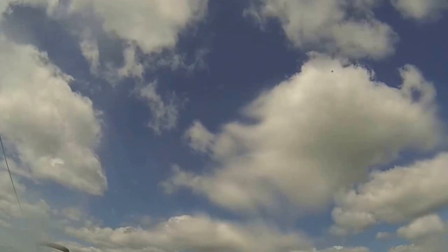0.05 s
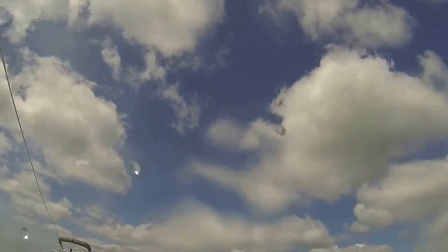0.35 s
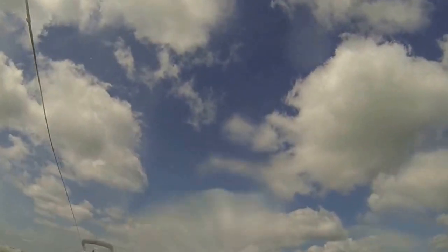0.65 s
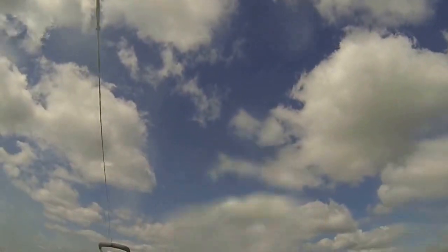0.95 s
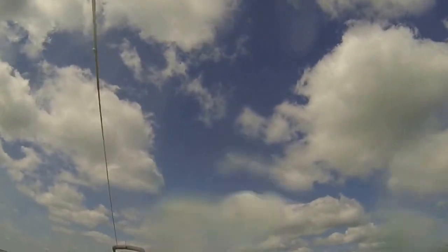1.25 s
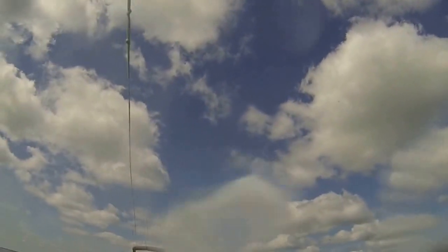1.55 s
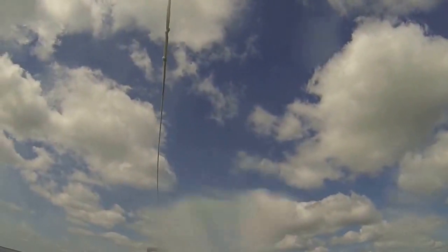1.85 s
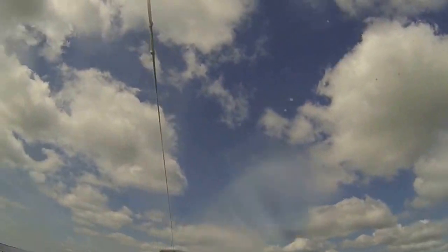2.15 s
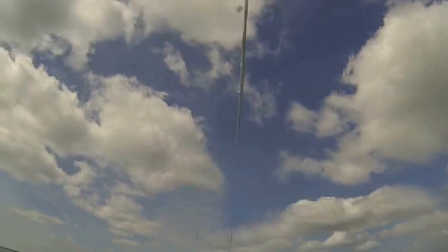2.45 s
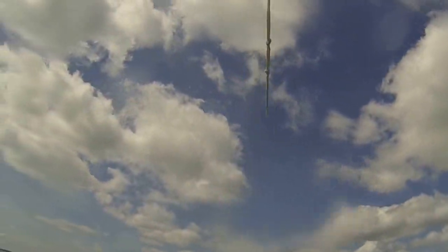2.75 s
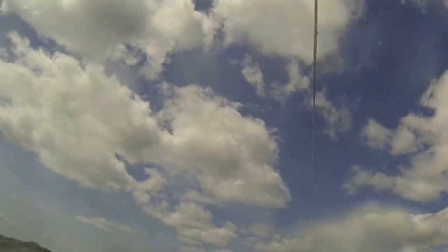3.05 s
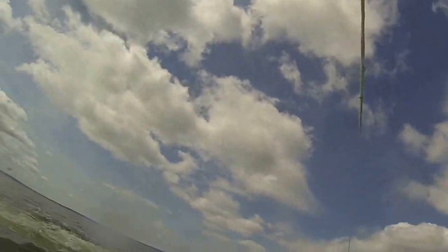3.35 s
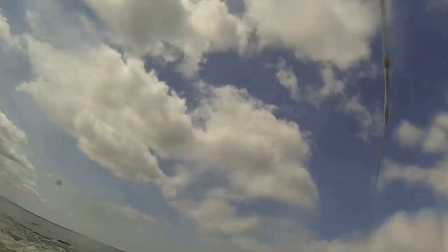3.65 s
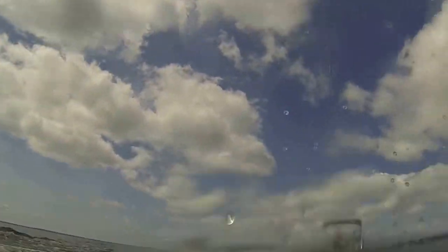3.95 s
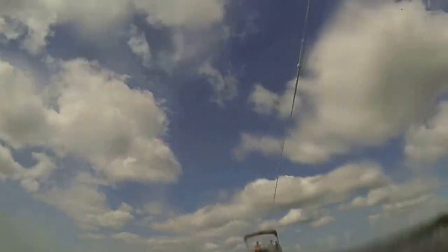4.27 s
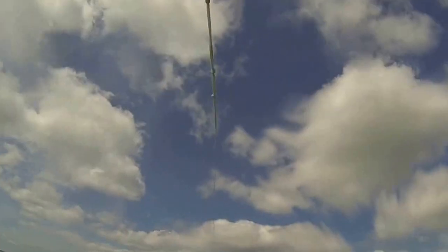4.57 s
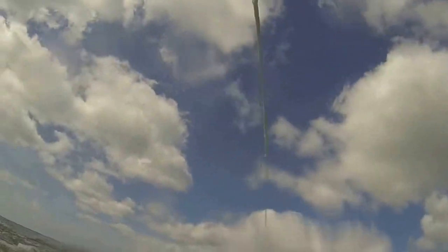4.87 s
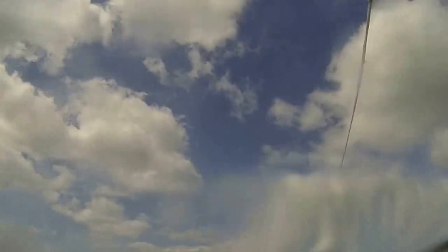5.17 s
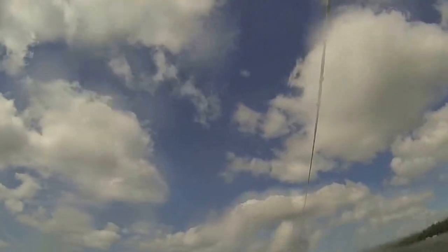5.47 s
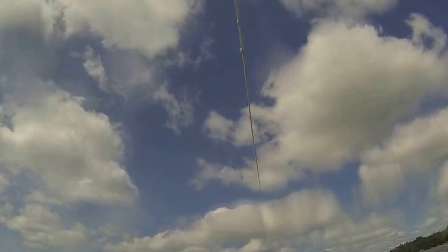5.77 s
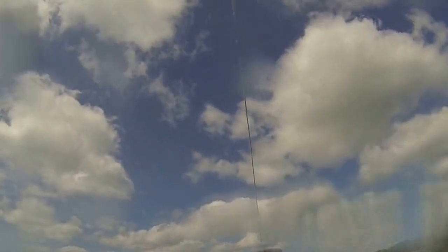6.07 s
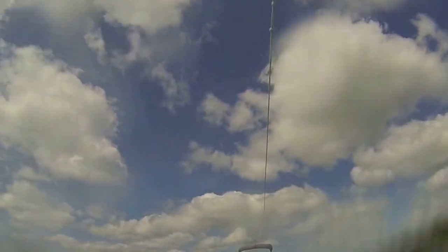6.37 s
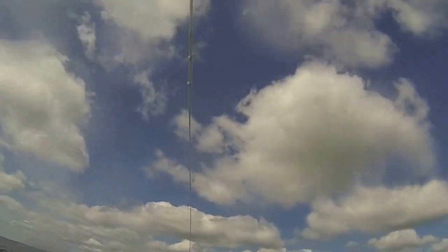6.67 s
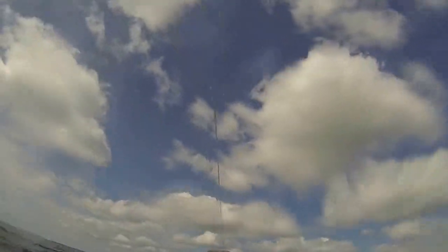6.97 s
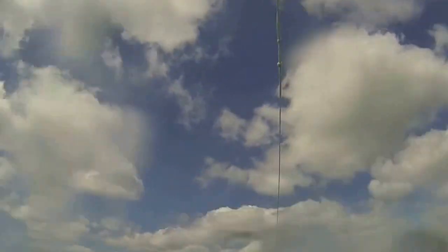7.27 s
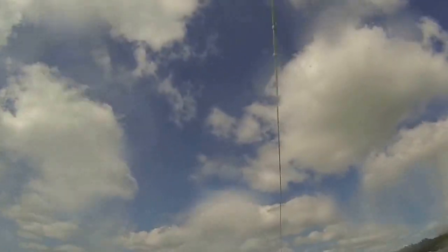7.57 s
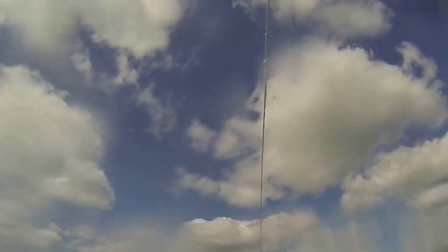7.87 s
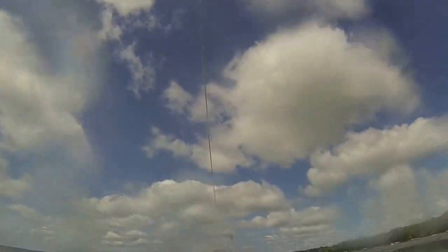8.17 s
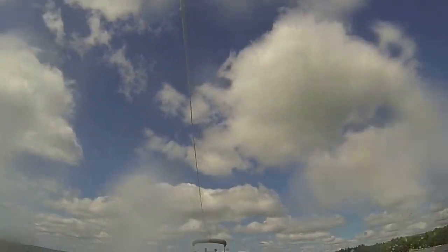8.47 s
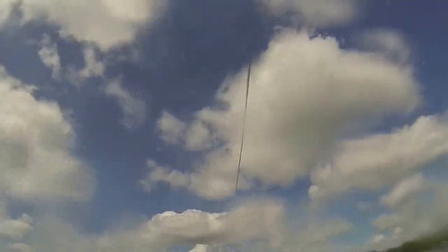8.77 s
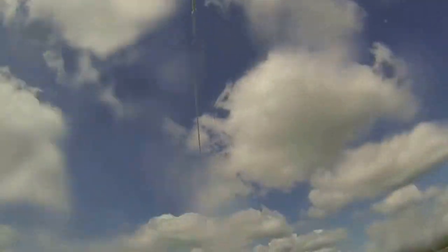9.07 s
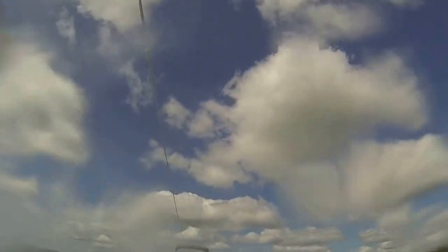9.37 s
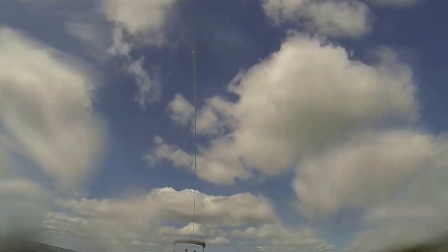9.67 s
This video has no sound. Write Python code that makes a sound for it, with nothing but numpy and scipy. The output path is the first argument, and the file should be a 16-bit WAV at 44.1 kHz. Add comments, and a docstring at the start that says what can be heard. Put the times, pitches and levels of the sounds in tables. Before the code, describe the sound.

A microphone in a waterproof case rides a tube towed fast over choppy open water. Wind shakes the case with a deep, continuous flutter. Just below, the wake surges and fizzes several times a second, sounding boxy, and hushes briefly with each skip. Water slaps the case, hard jolts make it click and thud, and drops plop on it. The loudest blows briefly overload the microphone.

```python
"""Open, choppy water, on a tube towed fast behind a motorboat; one microphone in a waterproof case.
Wind shakes the case with a deep flutter. Just below, the wake surges with each wave and hushes with
each skip, boxy through the case. Right at the microphone water slaps the case, hard jolts make it
click and drops plop on it; the loudest blows overload the microphone and the gain ducks briefly."""
import sys
import numpy as np
from scipy import signal
from scipy.fft import rfft, irfft, next_fast_len
from scipy.io import wavfile
from scipy.ndimage import uniform_filter1d, minimum_filter1d, map_coordinates

SR = 44100
rng = np.random.default_rng(int(sys.argv[2]) if len(sys.argv) > 2 else 0)


def master(y):
    """Save y as 16-bit WAV."""
    cut = np.clip(np.atleast_2d(y).T, -1, 1)
    pcm = np.round(cut * 32767)  # scale
    wavfile.write(sys.argv[1], SR, pcm.astype(np.int16))


N = 428652

# The tube ploughs into a wave. Each row: start and length in seconds, spray and churning in relative dB.
WAVES = [(0.0, 0.04, -27.5, -18.5), (0.252, 0.04, -30.5, -20.5), (0.537, 0.034, -37.5, -20.5),
         (0.663, 0.044, -31, -21.5), (0.844, 0.045, -33.5, -22), (0.952, 0.084, -35, -27.5),
         (1.302, 0.056, -30.5, -21.5), (1.477, 0.03, -36, -23), (1.59, 0.14, -36.5, -33),
         (1.821, 0.18, -39.5, -29), (2.254, 0.015, -27.5, -16.5), (2.63, 0.011, -35, -25),
         (2.944, 0.061, -34, -20), (3.048, 0.087, -40.5, -33), (3.452, 0.045, -33.5, -39),
         (3.542, 0.015, -26, -16), (3.83, 0.017, -37, -41), (3.965, 0.081, -38.5, -30),
         (4.353, 0.036, -33, -26.5), (4.456, 0.085, -37, -24.5), (4.73, 0.05, -29, -31),
         (4.839, 0.02, -23, -15.5), (5.182, 0.09, -42, -31), (5.378, 0.16, -41, -29.5),
         (5.606, 0.1, -49, -28.5), (5.797, 0.029, -35, -25), (6.083, 0.02, -36, -20.5),
         (6.224, 0.12, -48, -29), (6.456, 0.046, -28.5, -21), (6.76, 0.006, -32, -55),
         (6.812, 0.023, -29.5, -26.5), (7.053, 0.17, -43.5, -33.5), (7.299, 0.012, -26, -20.5),
         (7.333, 0.078, -33.5, -26.5), (7.624, 0.037, -27, -22), (7.846, 0.041, -28, -21),
         (8.141, 0.058, -32.5, -23.5), (8.345, 0.058, -35.5, -24.5), (8.535, 0.05, -35.5, -29.5),
         (8.597, 0.055, -30.5, -18.5), (8.818, 0.23, -35, -27.5), (9.099, 0.08, -37.5, -26),
         (9.283, .11, -46, -33.5), (9.5, 0.035, -41, -24.5), (9.679, 0.072, -40.5, -28.5)]
# Spray as heard inside the case. Each row: frequency in Hz, relative density in dB.
SPRAY = [(500, -12.5), (1000, -15), (1220, 1), (1430, 8.5), (1720, 3.5), (2150, -11), (2700, -14),
         (3350, -8.5), (3900, -23.5), (4400, -17.5), (5500, -27.5), (7800, -27.5), (11500, -69),
         (14500, -101)]
SKIP_DB = -8.5  # dip of spray and ticks while the tube is clear of the water


def amp(db):
    """Decibels to gain."""
    return 10 ** (np.asarray(db) / 20)


def unit(x):
    """Scale to rms 1."""
    return x / np.sqrt(np.mean(x ** 2) + 1e-20)


def curve(rows):
    """Join (seconds, value) points into one value per sample."""
    return np.interp(np.arange(N) / SR, *np.transpose(rows))


def wobble(rate):
    """A smooth random curve, rate knots a second."""
    coarse = np.arange(0, N, 12)
    knots = rng.standard_normal(int(N * rate / SR) + 4)
    return np.interp(np.arange(N), coarse, map_coordinates(knots, [coarse * rate / SR]))


def hiss(rate, ragged_db):
    """White noise whose level flickers at the given rate."""
    return rng.standard_normal(N) * amp(ragged_db * wobble(rate))


def filtered(x, response):
    """Filter x by a gain given as a function of Hz."""
    size = next_fast_len(N + SR // 2)
    return irfft(rfft(x, size) * response(np.fft.rfftfreq(size, 1 / SR)), size)[:N]


def coloured(x, spectrum):
    """x shaped by (Hz, dB) points on a log axis, at rms 1."""
    points_hz, db = np.transpose(spectrum)
    return unit(filtered(x, lambda hz: amp(np.interp(np.log(hz + 1), np.log(points_hz), db))))


def dulled(x, corner_hz):
    """Low-pass, 12 dB an octave."""
    return filtered(x, lambda hz: 1 / np.sqrt(1 + (hz / corner_hz) ** 4))


def wandering(x, depth, rate):
    """The pitch of everything in x drifts up and down by a share depth."""
    return map_coordinates(x, [np.arange(N) + np.cumsum(depth * wobble(rate))], mode="mirror")


def add(track, start, sound):
    """Mix a sound into the track from start seconds."""
    at = round(start * SR) + np.arange(len(sound))
    inside = (at >= 0) & (at < N)
    track[at[inside]] += sound[inside]


def scatter(rate):
    """Random moments, rate a second. Each row: sample, size and shape, both from -1 to 1."""
    rows = rng.random((3000, 3))[:int(rate * N / SR)]
    return [(int(at * N), 2 * size - 1, 2 * shape - 1) for at, size, shape in rows]


def skipping(fade_s=0.0059):
    """How far the tube is out of the water, 0-1."""
    # The tube skips clear. Each row: start and length in seconds.
    skips = [(0.159, 0.08), (0.422, 0.08), (0.798, 0.037), (1.072, 0.08), (2.069, 0.034), (2.208, 0.028),
             (2.54, 0.026), (2.781, 0.056), (3.316, 0.024), (4.319, 0.015), (5.002, 0.032), (5.752, 0.051),
             (6.682, 0.085), (7.738, 0.064), (8.48, 0.029), (9.586, 0.054)]
    t, clear = np.arange(N) / SR, np.zeros(N)
    for start, length in skips:
        end = start + length
        clear += np.interp(t, [start - fade_s, start, end, end + fade_s], [0, 1, 1, 0])
    return clear


def wind(db=-1.74, evenness=0.57, gust_db=2.5, skip_db=-4):
    """Eddies shed by the case give a deep flutter that wavers with the gusts."""
    # Airflow round the case. Each row: time in seconds, relative level in dB.
    airflow = [(0, -17), (1.3, -16.5), (2.13, -15), (2.22, -31), (2.33, -12.5), (2.57, -26.5),
               (2.67, -16.5), (2.87, -23), (2.97, -13), (3.2, -21.5), (3.5, -17.5), (6.32, -16),
               (6.42, -27), (6.54, -15.5), (8.64, -16), (8.93, -23), (9.0, -14.5), (9.72, -20)]
    # The flutter inside the case. Each row: frequency in Hz, relative density in dB.
    flutter = [(12, -22.5), (24, -8), (31, -9), (35, 4), (44, -11), (65, -15.5), (110, -23.5), (600, -120)]
    eddies = coloured(rng.standard_normal(N), flutter)
    swell = uniform_filter1d(np.abs(signal.hilbert(eddies)), size=3000)
    evened = unit(eddies / swell ** evenness)  # shedding partly evens out its own swells
    gusts_db = gust_db * wobble(rate=9) + skip_db * skipping()
    return amp(curve(airflow) + gusts_db + db) * evened


def swells(peaks_db, calm_db, linger_db, lag_s=0):
    """The wake's level in dB: each wave rises from the calm, holds, drops and leaves lingering foam."""
    attack_s, release_s, linger_s = 0.023, 0.027, 0.17  # each for a change of 20 dB
    t = np.arange(0, N, 32) / SR
    power = amp(calm_db) ** 2
    for (start, length, *_), peak_db in zip(WAVES, peaks_db):
        before = np.maximum(start + lag_s - t, 0)
        after = np.maximum(t - start - lag_s - length, 0)
        fall_db = np.maximum(-20 * after / release_s, linger_db - 20 * after / linger_s)
        power = power + amp(peak_db - 20 * before / attack_s + fall_db) ** 2
    return np.interp(np.arange(N) / SR, t, 10 * np.log10(power))


def chop(spatter_follows=0.56, usual_db=-30, churn_skip_db=-7):
    """Spray, churning and spatter in dB: a wave sprays first, then churns and flings more water."""
    # Small drops and lumps flying at the case. Each row: time in seconds, relative level in dB.
    spatter = [(0, -31.5), (.9, -47.5), (1.4, -43.5), (2.1, -40), (2.45, -19.5), (2.85, -55.5),
               (3.75, -38.5), (4.1, -23), (4.5, -55), (5.0, -35), (5.28, -13), (5.48, -53), (5.85, -32.5),
               (6.3, -36.5), (7.1, -42.5), (8.15, -35.5), (8.55, -57.5), (9.4, -30), (9.72, -44)]
    _, _, sprays_db, churns_db = np.transpose(WAVES)
    clear = skipping()
    surge_db = swells(sprays_db, calm_db=-44.5, linger_db=-7.5) + SKIP_DB * clear
    churning_db = swells(churns_db, calm_db=-37, linger_db=-7.0, lag_s=0.011) + churn_skip_db * clear
    spatter_db = curve(spatter) + spatter_follows * (churning_db - usual_db)
    return surge_db, churning_db, spatter_db


def fizz(count=4000, centre_hz=2200, pitch_spread=0.378, cycles=5, spread_db=3):
    """A cloud of tiny ringing bubbles in the foam, at rms 1."""
    at, pitch, size = rng.random(count), rng.standard_normal(count), rng.exponential(size=count)
    n = np.arange(SR // 70)
    turns = centre_hz * np.exp(pitch_spread * pitch)[:, None] * n / SR
    gains = amp(spread_db * np.minimum(size, 3))[:, None]
    rings = gains * turns * np.exp(-2 * turns / cycles) * np.sin(2 * np.pi * turns)
    samples = (at * N).astype(int)[:, None] + n
    return unit(np.bincount(samples.ravel(), rings.ravel(), N)[:N])


def wake(surge_db, churning_db, spray_db=1.05, sheet_db=-35.5, churn_db=1.1, uneven_db=1):
    """Foam fizzes and hisses in uneven surges of shifting pitch while water churns under the tube."""
    # A torn sheet of water, and the churning. Each row: frequency in Hz, relative density in dB.
    sheet_spectrum = [(600, -55.5), (1700, 15), (3400, 4.5), (4000, -17), (7000, -29), (16000, -98)]
    churn_spectrum = [(35, -16), (70, -7.5), (110, 0), (190, -2), (285, 1), (380, -8), (520, -13),
                      (650, -22), (800, -20), (1100, -68.5), (6000, -120)]
    foam = hiss(rate=200, ragged_db=3.8) + .35 * fizz()
    spray_gain = amp(surge_db + spray_db + uneven_db * wobble(rate=31))
    spray = spray_gain * wandering(coloured(foam, SPRAY), depth=.025, rate=12)
    # a strong surge tears off a brighter, grittier sheet of water
    sheet_gain = amp(1.02 * (surge_db + 28.0) + sheet_db)
    sheet = sheet_gain * coloured(hiss(rate=130, ragged_db=10.5), sheet_spectrum)
    churn = amp(churning_db + churn_db) * coloured(hiss(rate=80, ragged_db=5), churn_spectrum)
    return spray + sheet + churn


def plop(hz, cycles, rise=0.0081):
    """A strongly damped bubble: soft start, pitch rising as it nears the surface."""
    turns = hz * np.arange(SR // 60) / SR
    age = turns / cycles  # loudest at 1
    envelope = age ** 2 * np.exp(2 * (1 - age))
    return envelope * np.sin(2 * np.pi * turns * (1 + rise * np.tanh(age / 2)))


def burble(surge_db, db=-1, spread_db=5, centre_hz=2400, tilt_db=2):
    """Larger bubbles chirp in each surge, the low ones loudest."""
    out = np.zeros(N)
    for i, size, pitch in scatter(rate=70):
        gain = amp(surge_db[i] + db + spread_db * size - tilt_db * pitch)
        add(out, i / SR, gain * plop(centre_hz * np.exp(.35 * pitch), cycles=1.97))
    return out


def mist(surge_db, db=-32, follows=0.57):
    """Fine droplets crackle on the case all the time, swelling less than the spray."""
    # The droplets' crackle. Each row: frequency in Hz, relative density in dB.
    spectrum = [(600, -0.5), (1500, 6), (3600, 6), (4450, 2), (5300, -0.5), (8000, -3.5), (10000, -14.5),
                (12500, -15.5), (16000, -42)]
    return amp(follows * surge_db + db) * coloured(hiss(rate=280, ragged_db=6), spectrum)


def push(t, width_s, steep, fall=1.75):
    """A pressure pulse peaking near t = 0: quick rise, slower release."""
    age = np.clip(t / width_s + .25, -20, 40)
    pulse = np.exp(-fall * age) / (1 + np.exp(-steep * age)) ** 2
    return pulse / pulse.max()


def slap(width_s, rebound=0.67, spread=3.75, steep=7.64):
    """A lump of water presses on the case, which flexes back; centred 20 ms in."""
    t = np.arange(SR // 25) / SR - .02
    taper = np.hanning(len(t))
    pulse = taper * push(t, width_s, steep)
    flex = taper * np.exp(-(t / (spread * width_s)) ** 2)
    return pulse - rebound * flex * pulse.sum() / flex.sum()


def glug(width_s):
    """A small lump lands softly and springs straight back: round and faintly pitched."""
    return slap(width_s, rebound=0.96, spread=2.1, steep=4.3)


def slaps(spatter_db, big_db=1, tug_db=4, small_db=27, spread_db=6, small_limit=.45, grit_db=-24):
    """Big lumps of water hit the case, tug at it and burst into grit, in a dull patter of small ones."""
    # Lumps hitting the case. Each row: time in seconds, relative peak in dB, width in seconds.
    lumps = [(.016, -3.5, 0.0015), (.284, 9.5, 0.0011), (0.4374, -4, 0.0026), (.485, -4.5, 0.0017),
             (.998, 4, 0.0018), (1.144, -0.5, 0.0021), (1.549, -0.5, 0.0018), (1.776, 2, .0029),
             (2.131, -3, 0.0023), (2.272, 2, 0.0011), (2.326, -11, .0014), (2.497, -7, 0.0033),
             (2.65, 5, 0.00083), (3.011, 15, 0.00056), (3.504, 3, 0.0034), (3.854, -2.5, 0.0048),
             (3.8916, 2.5, 0.0017), (4.0706, 15, 0.00052), (4.103, 5.5, 0.001), (4.132, -7.5, 0.0013),
             (4.302, -8.5, 0.0019), (4.8233, 7.5, 0.00096), (5.071, 0, 0.001), (5.12, -5.5, 0.0012),
             (5.189, -6, 0.00055), (5.22, 3, 0.0013), (5.2789, 12.5, 0.00074), (5.3106, -1.5, 0.00079),
             (5.663, 2.5, 0.0017), (5.844, -1, .0017), (5.875, -4, 0.0023), (5.903, -4.5, 0.0032),
             (5.963, -6, 0.0027), (6.081, -3, 0.0018), (6.113, -3, 0.002), (6.346, -4, 0.002),
             (6.373, -3.5, 0.003), (6.507, -0.5, 0.0024), (6.643, -5.5, 0.0012), (6.845, -1, 0.004),
             (6.873, -5, .0023), (7.273, -1, 0.0047), (7.65, 1.5, 0.0035), (8.097, -1.5, 0.0046),
             (8.162, 6.5, 0.00084), (8.627, -0.5, 0.0022), (9.1672, 1, 0.0018), (9.31, -4, 0.0027),
             (9.34, -5.5, 0.0021), (9.39, -4, 0.0013), (9.4179, -2.5, 0.00076), (9.538, 10.5, 0.00072),
             (9.568, 1, 0.00076)]
    # Short knocks as water tears away. Each row: time in seconds, relative strength in dB.
    tugs = [(0.005, -1.5), (.14, -9), (0.264, -3.5), (2.114, -11.5), (2.338, -11.5), (2.639, -4.5),
            (3.739, -12), (3.877, -11.5), (4.047, -6), (4.8217, -4.5), (4.972, -11), (6.248, -11.5),
            (7.842, -10.5), (9.111, -11), (9.37, -11), (9.405, -8.5)]
    big, small = np.zeros(N), np.zeros(N)
    for at, peak_db, width_s in lumps:
        add(big, at - .02, amp(peak_db + big_db) * slap(width_s))
    for at, pull_db in tugs:
        add(big, at - .019, -np.tanh(amp(pull_db + tug_db)) * slap(width_s=0.0013))
    for i, size, shape in scatter(rate=48):
        peak = small_limit * np.tanh(amp(spatter_db[i] + small_db + spread_db * size) / small_limit)
        sign = rng.choice([-1, -1, 1])
        add(small, i / SR - .02, sign * peak * glug(width_s=0.0011 * np.exp(.8 * shape)))
    grit = amp(grit_db) * big.std() * coloured(big * rng.standard_normal(N), SPRAY)
    return dulled(big, corner_hz=3200) + dulled(small, corner_hz=1200) + grit


def click(db, tuning=1, decay_power=1.75, attack_s=0.00042):
    """The case rings a little differently with each jolt; the ring holds briefly, then dies away fast."""
    # Hard plastic ringing. Each row: frequency in Hz, relative level in dB, seconds to fall 60 dB.
    modes = [(1477, -8, 0.0081), (3260, -15, 0.0045), (4180, -11.5, .005), (4404, -1, 0.0065),
             (7200, -18, 0.0054), (7850, -10.5, 0.0031)]
    t = np.arange(SR // 60) / SR
    variations = rng.normal([0, 1], [2, .008], (len(modes), 2))
    ring = np.zeros(len(t))
    for (hz, mode_db, t60), (vary_db, detune) in zip(modes, variations):
        envelope = amp(mode_db + vary_db - 60 * (t / t60) ** decay_power)
        ring += envelope * np.sin(2 * np.pi * hz * detune * tuning * t)
    return amp(db) * ring * (1 - np.exp(-t / attack_s))


def jolts(spatter_db, click_db=4, lead_in_db=-11, snap_db=8, tick_db=-13, spread_db=7):
    """Jolts click the case and thud twice, quickly and unevenly; flying water snaps and ticks on it."""
    # Jolts to the case. Each row: time in seconds, ring and thud in relative dB.
    blows = [(0.017, -15.5, -9), (.296, -15, 0), (0.547, -24.5, -3), (.667, -13.5, -1.5),
             (.884, -34, -15.5), (1.002, -12, -3), (1.3, -16, -29), (1.595, -17.5, -16), (1.62, -28, -15.5),
             (1.653, -19, -13), (1.911, -16.5, -1.5), (2.159, -34, -22), (2.274, -7, 5), (2.654, -8, 5.5),
             (2.741, -32.5, -18), (2.994, -15, 0), (3.02, -17, -9), (3.055, -28, -10), (3.55, -6, -0.5),
             (3.579, -19.5, -16), (3.887, -17.5, -20), (3.975, -19.5, -2.5), (4.06, -27, -20),
             (4.086, -26.5, -17), (4.117, -28.5, -25), (4.18, -37, -9), (4.233, -22.5, -3),
             (4.794, -22.5, -7.5), (4.854, -26, -16), (4.956, -26, -20), (5.206, -20, -21),
             (5.27, -17, -27), (5.289, -29, -6), (5.325, -22.5, -5), (5.372, -29.5, -27),
             (5.39, -33.5, -13), (5.621, -23.5, -8), (5.645, -21.5, -3.5), (5.677, -25, -23),
             (5.702, -10, 8.5), (5.722, -17.5, -6), (5.806, -19, -11), (5.981, -29.5, -28),
             (6.053, -21, -8), (6.077, -21, -18), (6.094, -17.5, -7.5), (6.305, -22.5, -4.5),
             (6.88, -13.5, -3), (7.314, -15, -6), (7.543, -23, -8), (7.658, -20, 1), (7.858, -14.5, -1.5),
             (8.041, -34, -15), (8.081, -27.5, -7), (8.137, -25.5, -19), (8.158, -23, -6),
             (8.202, -18, -4.5), (8.635, -8, 2.5), (9.157, -23, -9), (9.287, -18.5, -6),
             (9.293, -31.5, -18), (9.363, -29.5, -14), (9.444, -18.5, 0), (9.507, -14, -17),
             (9.518, -28, -17), (9.668, -20.5, -4)]
    # Fast droplets snapping on the case. Each row: time in seconds, relative peak in dB.
    snaps = [(.376, -26), (0.863, -27.5), (.968, -30), (1.398, -28), (3.279, -30.5), (4.866, -28),
             (5.516, -26.5), (6.512, -24), (9.241, -25), (9.545, -25.5)]
    # The crack of a hit. Each row: frequency in Hz, relative density in dB.
    crack_spectrum = [(300, -1.5), (900, 16), (2500, 7), (4500, 7), (6300, -10), (8500, -8.5), (12000, -21),
                      (16000, -47.5)]
    thud_width_s, crack_t60, lead_in_s, margin_s = 0.0012, 0.0083, 0.015, .05
    knocks, envelope = np.zeros(N), np.zeros(N)
    t = np.arange(SR // 10) / SR - margin_s
    crack = (t > 0) * amp(-60 * np.abs(t) / crack_t60)
    # a faint hiss swells just before each jolt's crack
    lead_in = (t < 0) * amp(lead_in_db - 60 * np.abs(t) / lead_in_s)
    for (at, ring_db, thud_db), (late, shape) in zip(blows, rng.random((len(blows), 2))):
        thud = -amp(thud_db) * slap(thud_width_s * np.exp((shape - .5) / 2), rebound=0.43)
        add(knocks, at, click(ring_db + click_db))
        add(knocks, at - .0193, thud)
        add(knocks, at - .0185 + .003 * late, (shape - .5) * thud)
        add(envelope, at - margin_s, amp(ring_db) * (crack + lead_in))
    for at, peak_db in snaps:
        add(envelope, at - margin_s, amp(peak_db + snap_db) * crack)
    clear = skipping()
    for i, size, hardness in scatter(rate=55):
        drop_db = min(0.5 * spatter_db[i] + tick_db + spread_db * size, -34) + SKIP_DB * clear[i]
        # only the harder drops ring the case
        add(knocks, i / SR, max(hardness, 0) * click(drop_db, tuning=1 - .02 * size))
        add(envelope, i / SR - margin_s, .5 * amp(drop_db) * crack)
    cracks = envelope * hiss(rate=1200, ragged_db=3)
    return knocks + cracks.std() * coloured(cracks, crack_spectrum)


def drops():
    """Drops plop on the case; a few ring on in longer bursts near 1.4 kHz."""
    # The plops. Each row: time in seconds, peak in dB, pitch in Hz, cycles until loudest.
    plops = [(.127, -11.5, 1570, 0.84), (0.156, -10, 1450, 0.68), (.469, -16.5, 624, .7),
             (0.534, -14.5, 740, .7), (1.125, -20.5, 735, .8), (1.223, -17.5, 513, 0.74),
             (2.2607, -9.5, 1480, 1.7), (2.417, -8.5, 1700, 0.83), (2.977, -6.5, 1570, .9),
             (3.2931, -5.5, 1010, 0.62), (3.5398, -15, 1460, 3), (4.161, -14, 1300, .8),
             (4.192, -12.5, 1490, 0.79), (4.286, -14.5, 1330, 0.42), (4.717, -14.5, 1840, 2),
             (4.767, -11, 1410, 2.3), (4.771, -10.5, 1390, 3.5), (5.0537, -7.5, 1280, 0.92),
             (5.153, -5.5, 780, 0.45), (5.2536, -8, 1650, 0.93), (5.84, -13.5, 1470, 0.86),
             (5.961, -11.5, 1700, 0.86), (6.501, -14, 1640, 2.3)]
    out = np.zeros(N)
    for at, peak_db, hz, cycles in plops:
        add(out, at - 1 / hz, amp(peak_db) * plop(hz, cycles))
    return out


def scene():
    """Everything reaches the one microphone from close by, through the case."""
    surge_db, churning_db, spatter_db = chop()
    blows = slaps(spatter_db) + jolts(spatter_db) + drops()
    return (wind() + wake(surge_db, churning_db) + burble(surge_db) + mist(surge_db) + blows)[None]


def record(dry, threshold=0.94, duck_db=6, attack_s=0.0012, recover_s=0.032, limit=2.3, top_hz=16000):
    """The gain ducks briefly after each overload; a fast limiter and a soft ceiling hold the peaks."""
    mic = dry[0]
    t = np.arange(SR // 5) / SR
    overload = np.clip(np.abs(mic) - threshold, 0, 1 / 2)
    held = -minimum_filter1d(-overload, size=200, origin=99)  # running peak
    duck_shape = (1 - np.exp(-t / attack_s)) * np.exp(-t / recover_s)
    ducked = mic * amp(-duck_db * signal.fftconvolve(held, duck_shape)[:N] / 200)
    limiter_gain = minimum_filter1d(1 / np.maximum(np.abs(ducked) / limit, 1), size=81)
    limited = ducked * uniform_filter1d(uniform_filter1d(limiter_gain, size=41), size=41)
    squashed = limited / (1 + limited ** 6) ** (1 / 6)
    return filtered(squashed, lambda hz: hz < top_hz)[None]


dry = scene()
out = record(dry)
master(out)
```